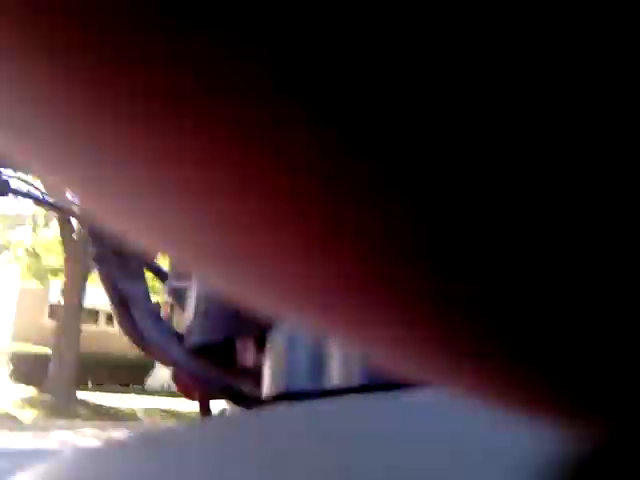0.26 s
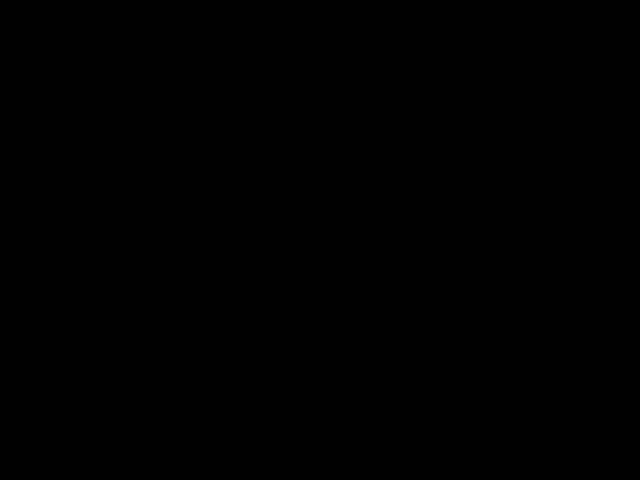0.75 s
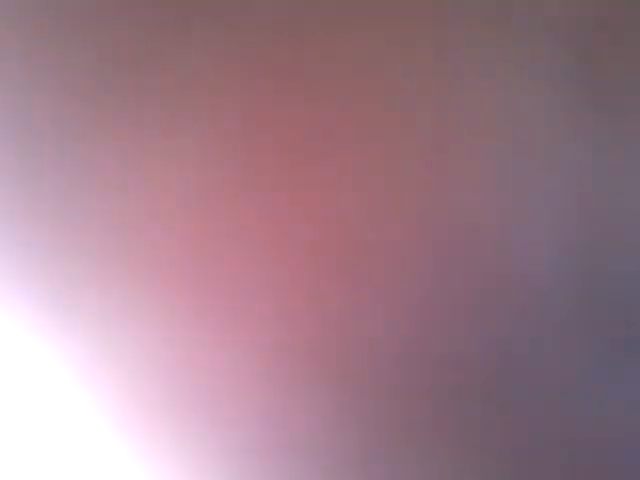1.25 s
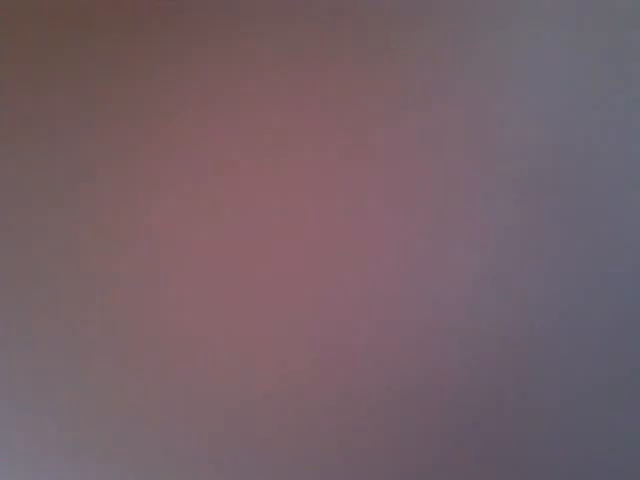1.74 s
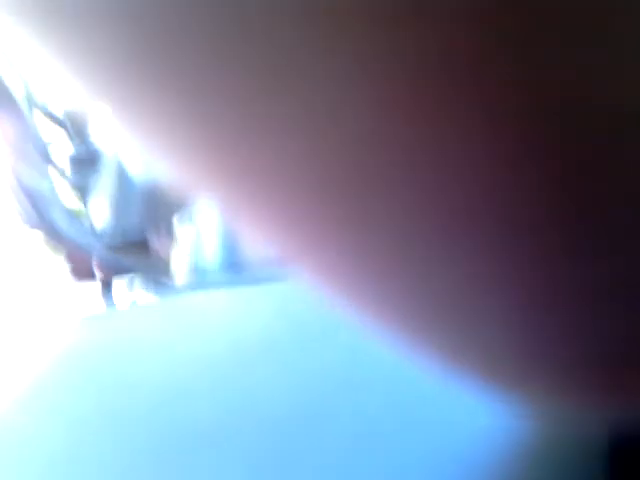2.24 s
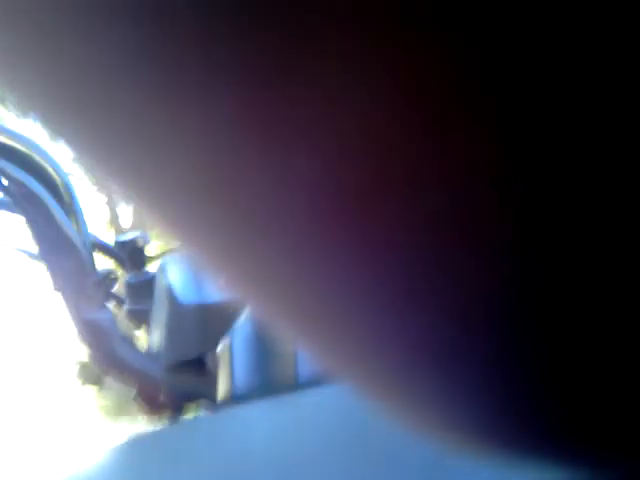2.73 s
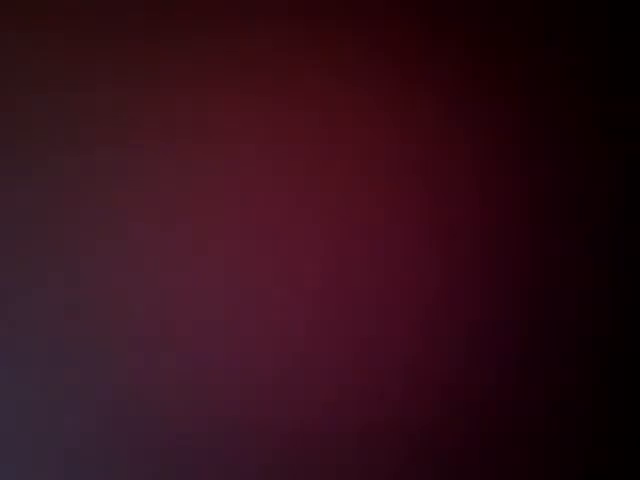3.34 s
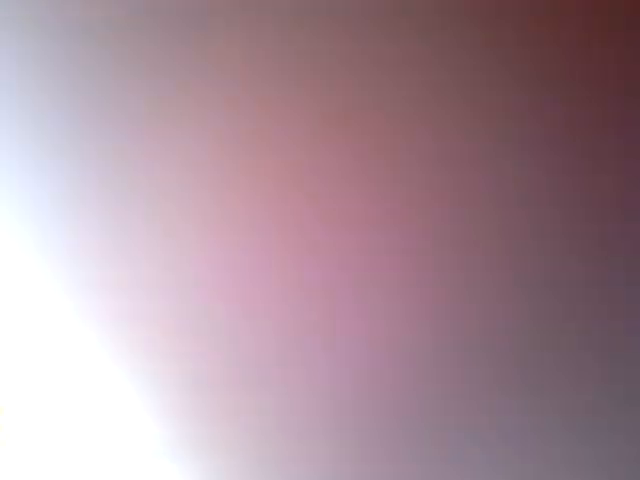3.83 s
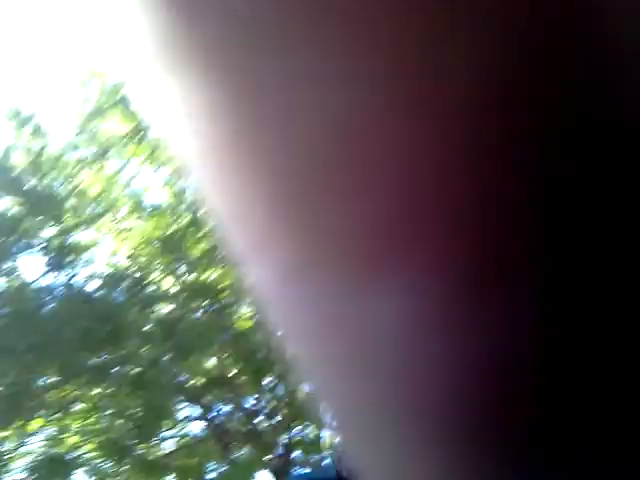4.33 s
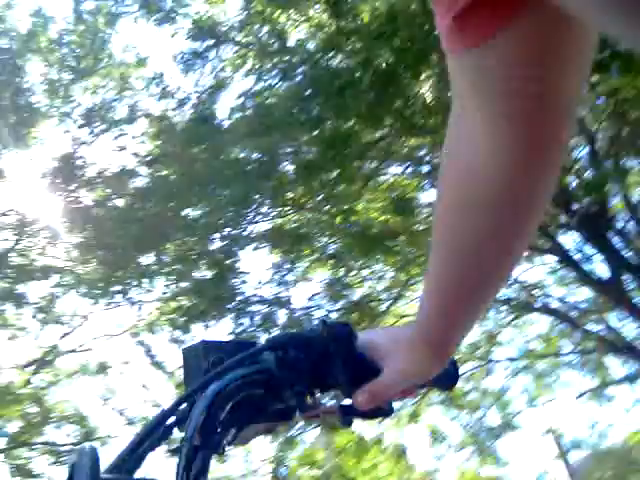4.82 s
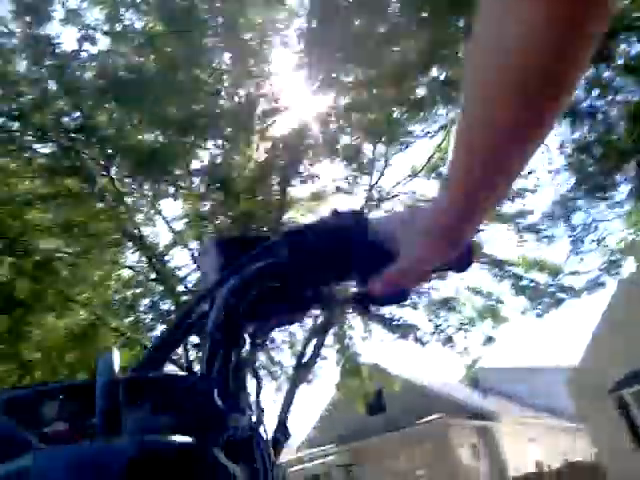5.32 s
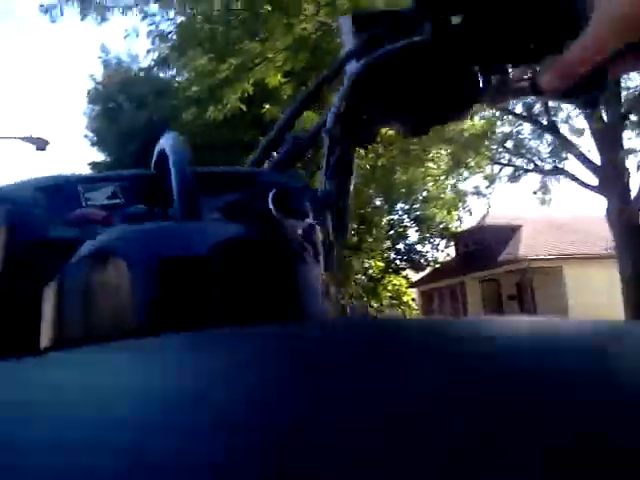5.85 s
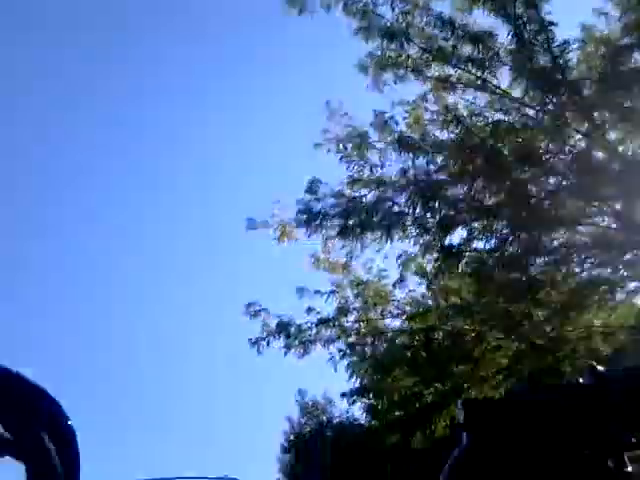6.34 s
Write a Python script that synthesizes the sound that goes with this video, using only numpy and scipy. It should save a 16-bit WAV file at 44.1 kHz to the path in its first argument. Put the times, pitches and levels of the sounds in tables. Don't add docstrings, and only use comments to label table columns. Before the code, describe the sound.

A low, lumpy idle with soft palm thuds and grainy finger rubs comes first. The engine barks briefly, slows, then is revved again and held, climbing as the machine pulls away. Sharp case knocks cluster in the middle and near the end, over faint street rumble, on a cheap handheld microphone that distorts at its loudest.

```python
import sys
import numpy as np
from scipy import signal
from scipy.fft import rfft, irfft, next_fast_len
from scipy.io import wavfile
from scipy.ndimage import uniform_filter1d, map_coordinates

SR = 44100
rng = np.random.default_rng(int(sys.argv[2]) if len(sys.argv) > 2 else 0)


def voltage_ratio(decibels):
    exponent = np.asarray(decibels, float) / 20
    return 10 ** exponent


def to_wav(sig):
    pcm = np.clip(np.atleast_2d(sig), -1, 1) * 32767
    pcm = np.round(pcm).astype(np.int16)
    wavfile.write(sys.argv[1], SR, pcm.T)


N = 290178

# (time [s], throttle [dB], shade [dB])
THROTTLE = [(0, -30.5, -1.5), (.25, -39.5, 1.5), (.88, -37, -1), (.95, -43, 0), (1.24, -42, -1),
            (1.3, -26, -4), (1.5, -24.5, 0), (1.85, -34, 4.5), (2.2, -34.5, -5), (2.66, -42, 5),
            (2.74, -24.5, -7), (3.4, -24, -2), (4.3, -20.5, 0), (4.65, -20.5, -1.5), (4.82, -22.5, -8.5),
            (5.5, -24.5, -5.5), (5.75, -23, 1), (6.5, -18, 3)]
# (time [s], contact [dB])
CONTACT = [(0, -53), (1.25, -45.5), (1.4, -30.5), (1.85, -51), (2.65, -48.5), (2.8, -37.5), (3.55, -32),
           (4.0, -34), (4.7, -25), (5.15, -24), (5.3, -22), (5.55, -26), (5.62, -13.5), (5.74, -11),
           (5.84, -15), (5.97, -25.5), (6.17, -31), (6.5, -22.5)]


def unit(x):
    return x / np.sqrt(np.mean(x ** 2) + 1e-20)


def curves(rows):
    s, *cols = np.transpose(rows)
    return [np.interp(np.arange(N) / SR, s, c) for c in cols]


def wobble(rate):
    knots = rng.standard_normal(int(N * rate / SR) + 4)
    return map_coordinates(knots, [np.arange(N) * rate / SR])


def filtered(x, response):
    m = next_fast_len(len(x) + SR // 2)
    return irfft(rfft(x, m) * response(np.fft.rfftfreq(m, 1 / SR)), m)[:len(x)]


def resonant(x, modes):
    def response(f):
        total = 0
        for k, (centre, width, db) in enumerate(modes):
            damping = 1j * f * width
            total = total + (-1) ** k * voltage_ratio(db) * damping / (centre * centre - f * f + damping)
        return total
    return filtered(x, response)


def steady(x, seconds):
    power = np.abs(uniform_filter1d(x ** 2, round(seconds * SR)))
    return x / np.sqrt(power + 1e-12)


def engine_speed():
    # (time [s], firing rate [1/s])
    speed = [(0.0, 12.51), (0.184, 10.5), (1.269, 9.22), (1.31, 15.65), (1.448, 20.07), (1.679, 18.75),
             (1.99, 9.93), (2.676, 9.97), (2.742, 16.36), (2.926, 18.94), (3.625, 18.54), (4.111, 24.55),
             (4.321, 26.54), (4.917, 27.01), (5.271, 24.94), (5.927, 21.83), (6.208, 28.98), (6.58, 36.85)]
    return curves(speed)[0]


def riding_off(seconds):
    clutch_s = 3.8
    return np.clip((np.arange(N) / SR - clutch_s) / seconds, 0, 1)


def follow_throttle(half_db, slope):
    half_throttle_db = -30
    return half_db + slope * (curves(THROTTLE)[0] - half_throttle_db)


def firing_sizes(count, spread_db):
    return voltage_ratio(rng.normal(0, spread_db, count[-1] + 1))[count]


def blow_down(since):
    return -np.exp(-((since - .004) / .0009) ** 2)


def exhaust_thump(rate, cycle):
    # (centre [Hz], width [Hz], level [dB])
    cool_pipe = [(88, 10, 3), (51, 84, -14.5), (160, 12, -19.5)]
    # (centre [Hz], width [Hz], level [dB])
    hot_pipe = [(97.7, 8, 4), (49.3, 150, -19), (114.7, 16, -9), (169.5, 95, -12.5)]
    pulses = firing_sizes(cycle.astype(int), 1) * blow_down(cycle % 1 / rate)
    drive = unit(pulses) + .55 * rng.standard_normal(N)
    heat = np.clip((rate - 12) / 4, 0, 1)
    ring = (1 - heat) * resonant(drive, cool_pipe) + heat * resonant(drive, hot_pipe)
    heard = voltage_ratio(follow_throttle(-27, 0.76) - 8 * riding_off(0.64) + 0.5)
    felt = voltage_ratio(curves(CONTACT)[0] - 3)
    return np.hypot(heard, felt) * steady(ring, 0.68)


def exhaust_bark(rate, cycle):
    # (centre [Hz], width [Hz], level [dB])
    mouth = [(316.8, 51, 2), (414.8, 41.3, 0), (613, 201, -6), (200, 57.3, -0.5), (927, 480, -24)]
    count = cycle.astype(int)
    since = cycle % 1 / rate
    echo = -.7 * np.exp(-((since - .0155) / .0011) ** 2)
    late = rng.normal(-.003, .00025, count[-1] + 1)[count]
    pair = np.interp(np.arange(N) - late * SR, np.arange(N), blow_down(since) + echo)
    crack = unit(resonant(-firing_sizes(count, 1.2) * np.gradient(pair), mouth))
    puff = since / 0.02 * np.exp(-since / 0.0082) + 0.16
    gas = unit(resonant(puff * rng.standard_normal(N), mouth))
    crack_gain = .85 - .35 * np.clip((rate - 19) / 4, 0, 1)
    bark = crack_gain * crack + .75 * gas
    return voltage_ratio(curves(THROTTLE)[0] + 1.5) * steady(bark, 0.15)


def valve_gear(cycle):
    # (centre [Hz], width [Hz], level [dB])
    cover_modes = [(1300, 790, -4.5), (1939, 43, 5), (2178, 100, -3.5), (2730, 320, 4), (3278, 310, -6),
                   (733, 340, 2.5)]
    decay = np.exp(-((cycle % 1 * 2) % 1) / .15)
    ticks = 1 + 1.1 * decay * voltage_ratio(3 * wobble(30))
    hiss = ticks * voltage_ratio(2.8 * wobble(12)) * rng.standard_normal(N)
    open_air = unit(filtered(hiss, lambda f: (f > 500) & (f < 4100)))
    clatter = unit(resonant(hiss, cover_modes)) + 0.55 * open_air
    shade_db = curves(THROTTLE)[1]
    return voltage_ratio(follow_throttle(-34, 0.81) + shade_db + 1.2) * unit(clatter)


def frame(rate, cycle):
    # (centre [Hz], width [Hz], level [dB])
    tank = [(160, 7.1, 9), (91.4, 14, 0), (47, 40, 0.5), (144.7, 3, 2), (108, 14, 0.5)]
    panel_top_db = -22

    def favour(f):
        return np.sqrt(sum(voltage_ratio(2 * db) / (1 + ((f - centre) / width * 2) ** 2) for centre, width, db in tank))

    turn = 4 * np.pi * cycle
    contact_db = curves(CONTACT)[0]
    once, twice, thrice = (favour(2 * k * rate) * voltage_ratio(contact_db + 3 + 1.8 * wobble(16)) for k in range(1, 4))
    thrice = thrice * voltage_ratio(-1.2 * np.maximum(contact_db - panel_top_db, 0))
    drift = .3 * np.array([wobble(10), wobble(10), wobble(10)])
    overtones = twice * np.cos(2 * turn + drift[1]) + thrice * np.sin(3 * turn + drift[2])
    return once * np.cos(turn + .15 + drift[0]) + riding_off(0.069) * overtones


def street():
    # (frequency [Hz], density [dB per Hz])
    spectrum = [(15, -45.5), (25, -14.5), (95, 3), (230, -21), (303, -16.5), (452, -31.5), (704, -20.5),
                (1570, -29.5), (3030, -35.5), (3440, -23.5), (3900, -44), (5070, -82), (8580, -120)]
    hz, db = np.transpose(spectrum)
    noise = filtered(rng.standard_normal(N), lambda f: voltage_ratio(np.interp(np.log(f + 1), np.log(hz + 1), db)))
    return voltage_ratio(-34.0 + 4.5 * wobble(5.8)) * unit(noise)


def touches(rows):
    out, t = np.zeros(N + SR), np.arange(SR // 12) / SR
    for s, db, hz, thud_db, length in rows:
        noise = unit(resonant(rng.standard_normal(len(t)), [(2570, 18000, 0)]))
        rattle = 1.53 * noise * np.clip(t / 0.0012, 0, 1) * np.exp(-(t / length) ** 3)
        swell = np.sin(np.pi * np.clip(t / (length + 1.1 / hz), 0, 1)) ** .6
        thud = -np.sin(2 * np.pi * hz * t) * swell
        out[round(s * SR):][:len(t)] += voltage_ratio(db) * rattle + voltage_ratio(thud_db) * thud
    return out[:N]


def palm_bumps():
    # (time [s], thud [Hz], thud level [dB])
    bumps = [
        (.109, 514, -21.5),
        (.707, 236, -15.5),
        (.738, 259, -21.5),
        (1.77, 200, -19.5),
        (1.839, 251.5, -17),
        (1.915, 200, -22),
        (1.991, 110, -8.5),
        (3.559, 108, -4),
        (4.553, 160, -8.5),
        (4.894, 152, -8.5),
    ]
    return touches([(s, db - 15.5, hz, db, .003) for s, hz, db in bumps])


def finger_rubs():
    # (start [s], end [s], level [dB], swell [dB], centre [Hz])
    strokes = [(0.446, 0.691, -39, 2, 2636), (0.796, 0.912, -27, 0.5, 2390), (1.869, 2.146, -36, 1.5, 1904),
               (2.471, 2.577, -39, 2, 2900), (3.202, 3.512, -38.5, 3, 1550), (4.568, 4.72, -19.5, 0, 2800),
               (4.794, 4.848, -20, 0, 2860), (5.432, 5.51, -34.5, 2, 2600),
               (5.582, 5.656, -32.5, 3.5, 2500), (5.854, 6.021, -23, 1, 2640),
               (6.081, 6.139, -35.5, 5.5, 1107)]
    out = np.zeros(N + SR)
    for start, end, db, swell_db, hz in strokes:
        u = np.linspace(0, 1, round((end - start) * SR))
        grain = rng.standard_normal((2, SR // 2))[:, :len(u)]
        rough = voltage_ratio(1.1 * unit(uniform_filter1d(grain[0], 160)))
        hiss = unit(resonant(rough * grain[1], [(hz, 1.1 * hz, 0), (500, 600, -8)]))
        fade = np.clip(np.minimum(u, 1 - u) / 0.21, 0, 1)
        out[round(start * SR):][:len(u)] += voltage_ratio(db + swell_db * (2 * u + 1.5)) * fade * hiss
    return out[:N]


def finger_knocks():
    # (time [s], peak [dB], thud [Hz], thud level [dB], rattle length [s])
    knocks = [(.891, -27, 367, -10, 0.003), (1.341, -18, 874, -36, .013), (2.743, -4.5, 1660, -19, 0.0019),
              (3.369, -10, 776, -14.5, .0043), (3.402, -15.5, 1240, -20, 0.0048),
              (3.491, 5, 427.5, -6.5, 0.0054), (3.532, 3, 657, -1, 0.0015), (3.542, -19.5, 3450, -21, .006),
              (3.731, -0.5, 498, -7, 0.0082), (4.031, -9.5, 1500, -10.5, 0.0027),
              (5.078, -40, 1300, -17, .0087), (5.711, 4.5, 927, -28.5, .0021), (5.753, 1, 1105, -7, 0.0038),
              (5.848, -2.5, 892, -13, .0014), (6.13, -0.5, 3470, -4.5, 0.0015),
              (6.157, -17.5, 606, -8.5, 0.0033)]
    return touches(knocks)


def shell_creaks():
    # (time [s], peak [dB], thud level [dB])
    slips = [(1.265, -17, -34), (2.147, -21.5, -15.5), (2.225, -18.5, -26), (2.24, -24, -40),
             (2.26, -15, -30), (2.275, -16, -21), (2.292, -16.5, -13.5), (2.305, -14, -11.5),
             (2.312, -17, -20), (2.326, -23.5, -21.5), (2.353, -20.5, -21), (2.941, -14, -17),
             (3.192, -17.5, -14), (3.243, -12.5, -14), (3.288, -9, -15.5)]
    return touches([(s, db, 620, thud_db, .0013) for s, db, thud_db in slips])


def slap():
    # (peak [dB], thud [Hz], thud level [dB])
    first = (-7.5, 606, -0.71)
    start_s, step_s, sinks, dull_db, swell_db = 1.982, .0021, .57, -3, 5.5
    db, hz, thud_db = first
    rows = []
    for k in range(3):
        rows.append((start_s + step_s * k, db + dull_db * k, hz * sinks ** k, thud_db + swell_db * k, .003))
    return touches(rows)


def piston_whine(rate, cycle):
    # (multiple of the crank turn [1], level re throttle [dB])
    partials = [(2.5, -10), (4, -8.5), (5, -7.5), (6, -7.5), (8, -8)]
    top_hz = 475
    turn = 4 * np.pi * cycle
    throttle_db = curves(THROTTLE)[0]
    out = np.zeros(N)
    for k, db in partials:
        held = 1 / (1 + (2 * k * rate / top_hz) ** 12)
        level = held * voltage_ratio(throttle_db + db + 4 * wobble(6))
        out += level * np.sin(k * turn + .6 * wobble(12))
    return riding_off(0.069) * out


def scene():
    rate = engine_speed()
    cycle = np.cumsum(rate) / SR
    exhaust = exhaust_thump(rate, cycle) + exhaust_bark(rate, cycle)
    machine = exhaust + valve_gear(cycle) + frame(rate, cycle) + piston_whine(rate, cycle)
    hand = palm_bumps() + finger_rubs() + finger_knocks() + shell_creaks() + slap()
    return (machine + street() + hand)[None]


def low_pass(x):
    return signal.sosfilt(signal.butter(12, 15850, fs=SR, output="sos"), x)


def record(dry):
    up, down = 80, 441
    slow = signal.resample_poly(dry[0], up, down)
    slow = slow / (1 + np.abs(slow / .71) ** 7) ** (1 / 7)
    fast = signal.resample_poly(slow, down, up)[:N]

    def edge(f):
        mirror = voltage_ratio(-10.5) * (f > 4150) * (f < 4570)
        return 1 / (1 + (f / 3850) ** 40) + mirror

    fast = filtered(np.pad(fast, (0, N - len(fast))), edge)
    full = np.clip((np.abs(uniform_filter1d(fast, 40)) - .6) / .06, 0, 1)
    hunting = voltage_ratio(-25) * full * np.sin(2 * np.pi * 4000 * np.arange(N) / SR)
    top = np.clip(fast + hunting, -.705, .705)
    return low_pass(top[None])


dry = scene()
out = record(dry)
to_wav(out)
```